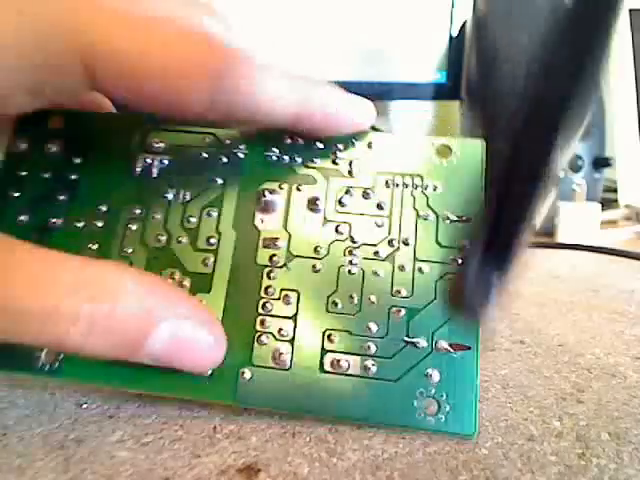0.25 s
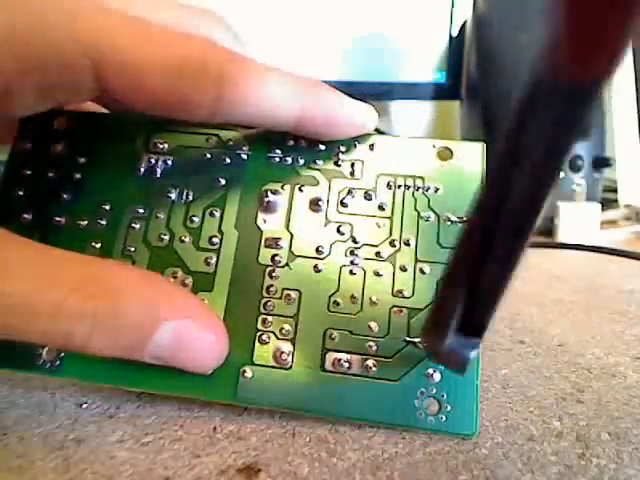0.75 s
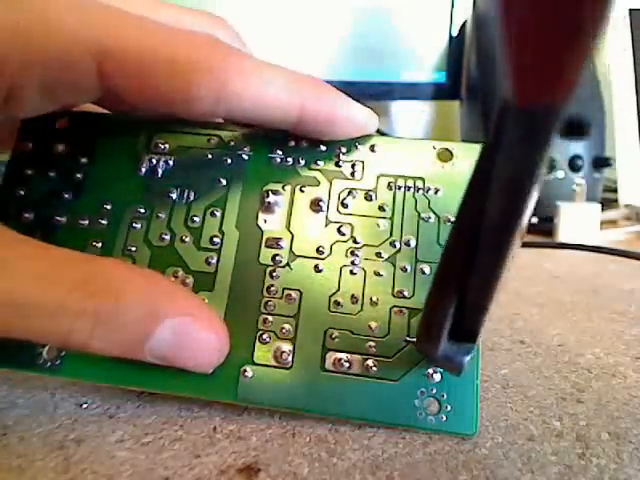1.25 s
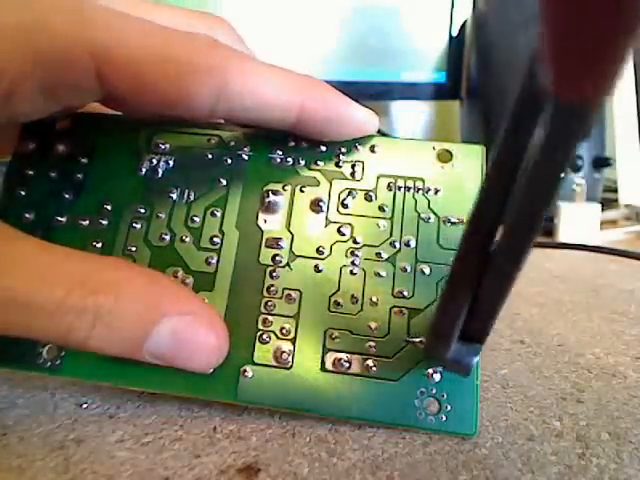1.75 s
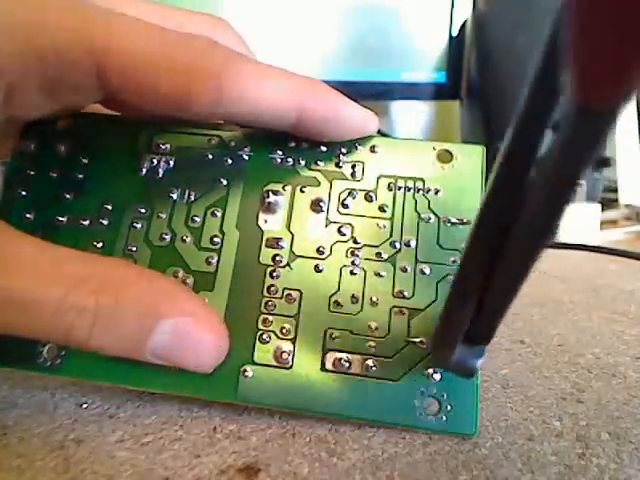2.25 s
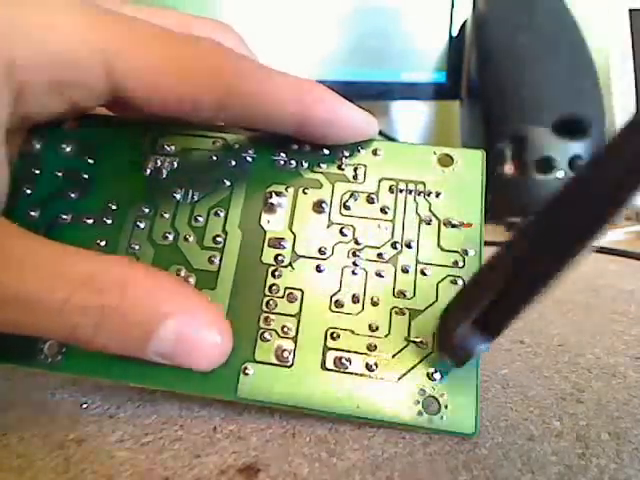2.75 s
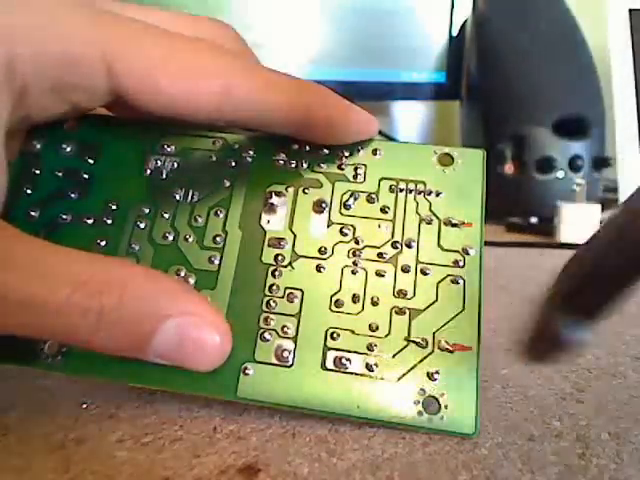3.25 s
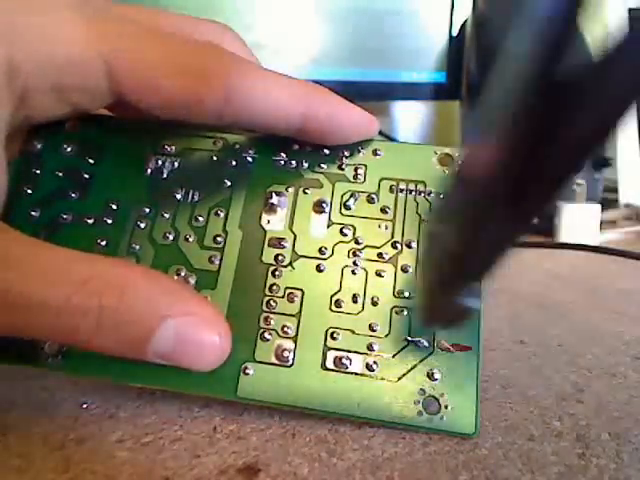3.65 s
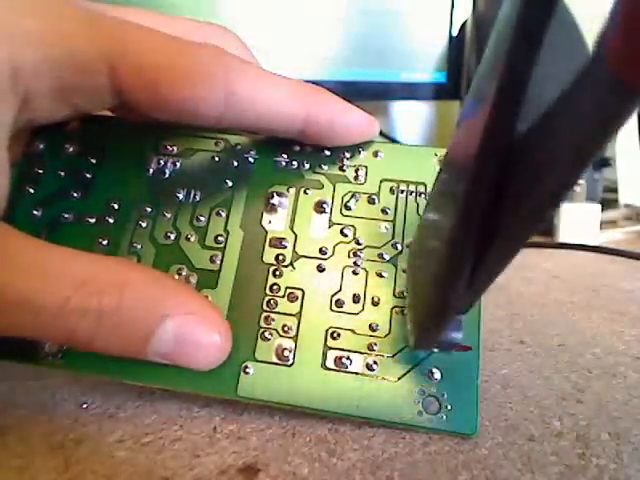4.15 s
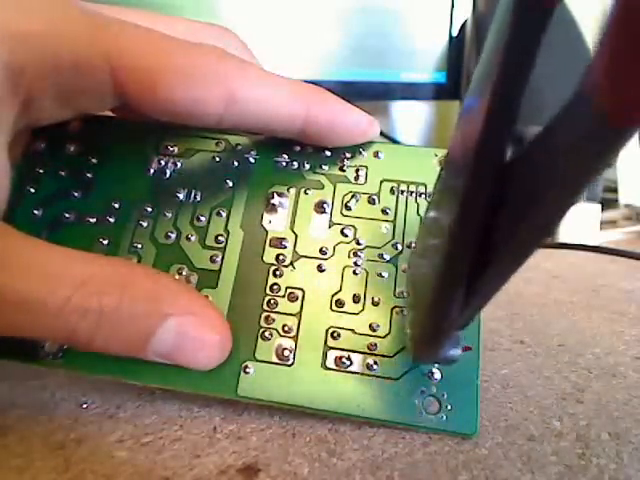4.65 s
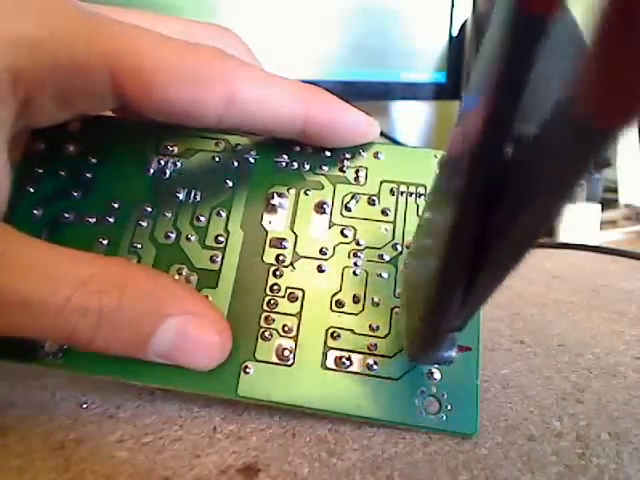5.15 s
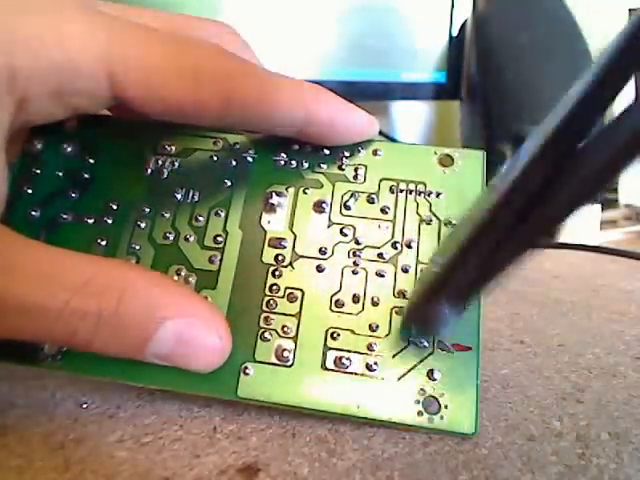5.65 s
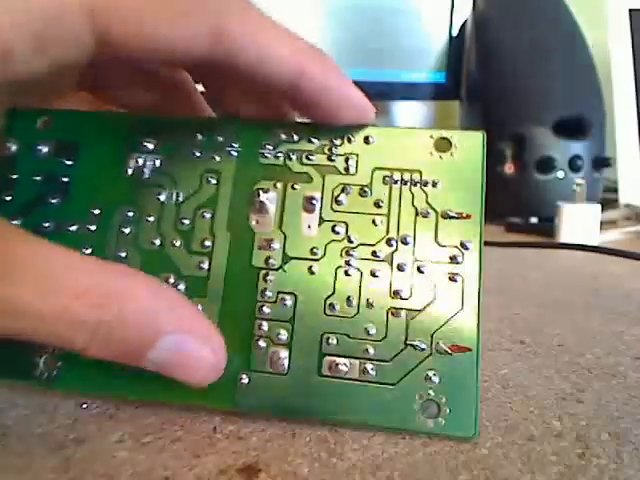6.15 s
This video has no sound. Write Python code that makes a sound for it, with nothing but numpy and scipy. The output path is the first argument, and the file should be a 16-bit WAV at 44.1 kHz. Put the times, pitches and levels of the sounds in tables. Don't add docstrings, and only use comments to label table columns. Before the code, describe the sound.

In a small room with humming fans, cutter jaws tap and bump a thin board, each contact short, dry and woody with a little steel click. Faint drags and skids fall between the knocks. A sharp crack and snip come midway, then stronger thuds, and a piercing clip at the very end sprays tiny debris. A far engine drones low, swelling and sinking slightly. The close, inexpensive camera microphone sounds dull and band-limited.

```python
import sys
import numpy as np
from scipy import signal
from scipy.io import wavfile
from scipy.ndimage import uniform_filter1d

SR = 44100
rng = np.random.default_rng(int(sys.argv[2]) if len(sys.argv) > 2 else 0)


def store_pcm(level_fs):
    pcm = np.round(np.clip(level_fs, -1, 1) * 32767).astype(np.int16)
    wavfile.write(sys.argv[1], SR, np.atleast_2d(pcm).T)


def voltage_ratio(decibels):
    exponent = np.asarray(decibels, float) / 20
    return 10 ** exponent


N = 282813

# frequency in Hz, density in dB per Hz.
ROOM_SPECTRUM = [(8.8, -27), (15, -1), (27, -23.5), (65, -11), (88, -28.5), (124, -15.5), (149, -33),
                 (231, -12.5), (264, -30.5), (360, -13), (390, -25), (767, -28.5), (6500, -49.5),
                 (7600, -52.5), (9880, -79), (16700, -120)]
ROOM_DB = -45
# frequency in Hz, width in Hz, level in dB.
FAN_WHIRRS = [(29.8, 25, -56.5), (50.7, 5, -57), (58.1, 1.5, -59), (87.2, 6, -61), (319.6, 13, -65),
              (774.6, 40, -63.5)]

# time in seconds, firing rate in Hz.
ENGINE_HZ = [
    (0, 121.5),
    (2.0, 121.2),
    (3.9, 119.3),
    (4.5, 116.8),
    (6.0, 116.4),
    (6.41, 114.5),
]
# middle in seconds, half length in seconds, level in dB.
ENGINE_SWELLS = [
    [(2.5, 0.18, -55), (3.85, .3, -56), (5.3, .35, -56), (6.1, 0.53, -51)],
    [(0, 0.21, -57.5), (2.8, 0.47, -52), (4.4, 1, -58.5), (5.95, 0.45, -55.5), (6.41, 0.039, -52.5)],
    [(.7, 0.14, -70), (3.05, 0.15, -61), (3.8, 0.27, -54.5), (4.8, 0.35, -58), (5.5, .3, -61.5)],
    [(2.75, .2, -66), (3.7, 0.17, -63), (4.85, .3, -61), (6.0, .12, -62.5)],
]
MUFFLED_DB = -78.5

# start in seconds, length in seconds, board
# rasp in dB, blade tips in dB, bench shudder in dB.
DRAGS = [
    (0.372, 0.13, -68, -70.5, -52),
    (3.094, 0.044, -50.5, -59.5, -54.5),
    (3.247, 0.1, -69.5, -69, -55.5),
    (5.721, 0.25, -65, -72, -48),
    (6.224, .14, -66, -70.5, -56),
    (6.339, 0.053, -54, -64.5, -59),
]
DRAG_BOARD_HZ, DRAG_BOARD_WIDTH_HZ = 2100, 2100
DRAG_TIPS_HZ, DRAG_TIPS_WIDTH_HZ = 6400, 920
# start in seconds, length in seconds, level in dB, centre in Hz.
SKIDS = [(0.089, 0.21, -70.5, 2950), (0.383, 0.1, -62.5, 2010), (0.386, 0.089, -70, 2860),
         (1.509, 0.018, -77, 2080), (1.5093, 0.02, -75.5, 2900), (1.528, 0.021, -74, 2801),
         (2.264, 0.18, -66, 3270), (2.665, 0.16, -72, 3050), (3.096, 0.047, -56, 4400),
         (3.097, 0.027, -56, 3220), (3.105, 0.048, -50.5, 718), (3.107, 0.033, -45.5, 302.8),
         (3.11, 0.065, -58, 2100), (3.13, 0.16, -69, 6450), (3.25, 0.1, -71, 2850),
         (3.262, 0.04, -66, 1555), (4.231, 0.042, -56.5, 350), (4.605, 0.028, -53, 299.6),
         (4.9162, 0.019, -47, 301), (4.972, 0.019, -75, 4900), (5.795, 0.047, -67, 1480),
         (5.823, 0.04, -67.5, 1503), (6.344, 0.036, -50, 7630), (6.345, 0.018, -61, 5200),
         (6.347, 0.026, -51, 3810)]
SKID_WIDTH_SHARE = 0.18
SHUDDER_DB = -13
# start in seconds, length in seconds, level in dB.
SCATTERS = [
    (3.125, 0.09, -65.5),
    (3.415, 0.14, -71.5),
    (6.073, 0.11, -75.5),
    (6.354, 0.15, -55.5),
]
SCATTER_HZ, SCATTER_WIDTH_HZ = 4360, 5000

# time in seconds, bench in dB, board's low modes in dB,
# board's high modes over its low ones in dB.
KNOCKS = [(0.173, -51, -50.5, 5), (0.397, -42, -36, -12), (0.422, -59, -36, -12), (1.0106, -21, -28, -2),
          (1.111, -39, -43, -2), (1.3173, -24.5, -31.5, -8.5), (1.697, -38, -50, -8),
          (2.329, -36, -58.5, 2), (2.449, -38.5, -54.5, 1), (2.6257, -36, -56, -14),
          (3.1065, -42.5, -17.5, 6.5), (3.194, -38, -40, -4.5), (3.279, -41, -40, 2.5),
          (4.2023, -24, -29.5, 5.5), (4.23, -28, -34, -1.5), (4.48, -35, -49, -20), (4.515, -31, -38, -4),
          (4.6031, -25.5, -21.5, -0.5), (4.647, -25.5, -27, -0.5), (4.9186, -12.5, -19, -13.5),
          (4.978, -25, -36, -7), (5.3484, -26.5, -32.5, -3.5), (5.626, -38.5, -63, -2),
          (5.775, -28, -35, -3), (5.858, -27.5, -39.5, -11.5), (5.95, -46.5, -42, -10),
          (6.257, -29, -36, -25), (6.3472, -35, -35, 4.5)]
# time in seconds, jaws in dB, blade tips over jaws in dB.
TICKS = [(1.0085, -41.5, -9), (1.3185, -44.5, -19.5), (1.484, -56.5, -4.5), (1.694, -54.5, -3),
         (2.329, -49.5, -16.5), (2.624, -45, -5), (3.1063, -32, 9.5), (3.194, -65.5, 25),
         (3.279, -59.5, 25.5), (3.415, -33.5, 3.5), (3.553, -47.5, 2.5), (4.2023, -35, -33),
         (4.6025, -41, -4.5), (4.9198, -34.5, -34), (4.977, -41.5, -5.7), (5.3478, -36.5, -22.5),
         (5.624, -48.5, -10.5), (5.858, -54, -1.5), (6.3453, -20.5, 1.5), (6.352, -26.5, 6.5)]
JAWS_UNDER_DB, TIPS_UNDER_DB = -18, -35
BOARD_UNDER_DB = -12.5

# frequency in Hz, level in dB, decay by 60 dB in seconds.
BENCH_MODES = [(171, -8, 0.1), (223.7, 0, 0.12), (283.4, 6, 0.08), (302.8, -0.5, 0.097),
               (386.4, -1.5, 0.16), (414, -5.5, 0.15), (495, -17.5, 0.048)]
# frequency in Hz, level in dB, decay by 60 dB in seconds.
BOARD_LOW_MODES = [(644, -5.5, 0.13), (716, 2, 0.11), (835, 9.5, 0.03), (950, 7, 0.033),
                   (1070, -15, 0.0083)]
# frequency in Hz, level in dB, decay by 60 dB in seconds.
BOARD_HIGH_MODES = [(1546, 7.5, 0.045), (1640, 11, 0.02), (1977, 9.5, 0.038), (2100, -22.5, 0.027),
                    (2530, -28.5, 0.014)]
# frequency in Hz, level in dB, decay by 60 dB in seconds.
JAW_MODES = [(2290, 1, 0.0042), (2900, -1, 0.037), (3080, 3.5, 0.013), (3745, 11, 0.011), (4230, -4, 0.012),
             (4390, -0.5, 0.007), (4900, -6, 0.0082), (5270, -15, 0.006)]
# frequency in Hz, level in dB, decay by 60 dB in seconds.
TIP_MODES = [(6090, 1.5, 0.029), (6450, -4.5, 0.016), (6500, -10.5, 0.0058), (6560, 5, 0.0028),
             (7150, -5.5, 0.0096)]
# modes, chatter in seconds, chatter in dB, room tail in seconds, room tail in dB,
# usual tilt in dB.
BODIES = [(BENCH_MODES, .006, -28, .03, -40, 4.0),
          (BOARD_LOW_MODES, .004, -24, .025, -40, 2.0),
          (BOARD_HIGH_MODES, .003, -22, .02, -38, 5.5),
          (JAW_MODES, .003, -20, .02, -36, -3.0),
          (TIP_MODES, .004, -18, .015, -34, 4.0)]

MIRROR_DB, MIRROR_KEPT_OVER_DB, MIRROR_FADES_HZ = -30, -58, 10200


def rms_one(x):
    return x / np.sqrt(np.mean(x ** 2) + 1e-20)


def drift(rate_hz):
    knots_hz = 40
    knots = rng.standard_normal(int(N / SR * knots_hz) + 40)
    r = np.exp(-2 * np.pi * rate_hz / knots_hz)
    slow = signal.lfilter([1], [1, -r], knots)[30:]
    return np.interp(np.arange(N) / SR * knots_hz, np.arange(len(slow)), rms_one(slow))


def bandpass(x, edges_hz):
    return signal.sosfilt(signal.butter(2, edges_hz, "band", fs=SR, output="sos"), x)


def resonance(x, hz, width_hz):
    r = np.exp(-np.pi * width_hz / SR)
    poles = [1, -2 * r * np.cos(2 * np.pi * hz / SR), r * r]
    return signal.lfilter([(1 - r * r) / 2, 0, (r * r - 1) / 2], poles, x)


def ring(push, hz, t60_s):
    r = voltage_ratio(-60 / (t60_s * SR))
    w = 2 * np.pi * hz / SR
    return signal.lfilter([0, np.sin(w)], [1, -2 * r * np.cos(w), r * r], push + 1e-18)


def add(out, piece, start_s):
    i = round(start_s * SR)
    out[i:i + len(piece)] += piece[:N - i]


def room():
    rumble, together = 0, drift(2.5)
    edges_hz = 14 * 2 ** np.arange(0, 9.6, 1 / 3)
    white = rng.standard_normal((2, N + SR))
    hz, db = np.transpose(ROOM_SPECTRUM)
    for k, (low, high) in enumerate(zip(edges_hz, edges_hz[1:])):
        band = bandpass(white[k % 2], [low, high])[SR:]
        log_centre = np.log(min(low * high, 7500 ** 2)) / 2
        level_db = np.interp(log_centre, np.log(hz), db)
        rumble = rumble + voltage_ratio(level_db + 0.24 * together + 1.4 * drift(11)) * band
    air = rng.standard_normal(N + SR)
    whirrs = 0
    for f, width_hz, whirr_db in FAN_WHIRRS:
        narrow = resonance(resonance(air, f, width_hz), f, width_hz)[SR:]
        whirrs = whirrs + voltage_ratio(whirr_db) * rms_one(narrow)
    return voltage_ratio(ROOM_DB - 3.0) * rms_one(rumble) + whirrs


def drone():
    t = np.arange(N) / SR
    turn = 2 * np.pi * np.cumsum(np.interp(t, *np.transpose(ENGINE_HZ))) / SR
    out = np.zeros(N)
    for k, swells in enumerate(ENGINE_SWELLS):
        gain = voltage_ratio(MUFFLED_DB) + sum(voltage_ratio(db) * np.exp(-((t - s) / half_s) ** 2) for s, half_s, db in swells)
        out += np.sqrt(2) * gain * voltage_ratio(0.54 * drift(1.5)) * np.sin((k + 1) * turn + k)
    return out


def stroke(length_s, peaks, bench_db):
    luck = rng.random((3, SR // 4))
    phase = np.clip(np.arange(SR // 4) / SR / length_s, 0, 1)
    pressure = np.sin(np.pi * phase ** 0.48) ** 2.6
    size = voltage_ratio(-2.2 * np.log(luck[2] + 0.00034))
    grains = (luck[0] < .2) * np.sign(luck[1] - .5) * size * pressure
    rasp = 0
    for hz, width_hz, db in peaks:
        rasp = rasp + voltage_ratio(db) * rms_one(resonance(resonance(grains, hz, width_hz), hz, 0.64 * width_hz))
    shaken = BENCH_MODES + BOARD_LOW_MODES[:2]
    shudder = sum(voltage_ratio(db) * ring(grains, hz, t60_s) for hz, db, t60_s in shaken)
    to_stroke = np.sqrt(len(phase) / SR / length_s)
    return to_stroke * (rasp + voltage_ratio(bench_db) * rms_one(shudder))


def scrapes():
    out = np.zeros(N)
    for s, length_s, board_db, tips_db, bench_db in DRAGS:
        board = (DRAG_BOARD_HZ, DRAG_BOARD_WIDTH_HZ, board_db)
        tips = (DRAG_TIPS_HZ, DRAG_TIPS_WIDTH_HZ, tips_db)
        add(out, stroke(length_s, [board, tips], bench_db), s)
    for s, length_s, db, hz in SKIDS:
        add(out, stroke(length_s, [(hz, SKID_WIDTH_SHARE * hz, db)], db + SHUDDER_DB), s)
    for s, length_s, db in SCATTERS:
        add(out, stroke(length_s, [(SCATTER_HZ, SCATTER_WIDTH_HZ, db)], db + SHUDDER_DB), s)
    return out


def struck(modes, push, tilt_db, luck):
    slope_db = np.linspace(-tilt_db, tilt_db, len(modes))
    sound = 0
    for (hz, db, t60_s), up_db, z in zip(modes, slope_db, luck):
        sound = sound + voltage_ratio(db + up_db + 2.0 * z) * ring(push, hz, t60_s)
    sound = bandpass(sound, [modes[0][0] * .75, modes[-1][0] * 1.12])
    return sound / np.abs(sound).max()


def knocks():
    out = np.zeros(N)
    t = np.arange(round(.22 * SR)) / SR
    contacts = []
    for s, bench_db, low_db, up_db in KNOCKS:
        high_db = low_db + up_db
        contacts.append((s, bench_db, low_db, high_db, high_db + JAWS_UNDER_DB, high_db + TIPS_UNDER_DB))
    for s, jaws_db, up_db in TICKS:
        contacts.append((s, jaws_db + BOARD_UNDER_DB, jaws_db, jaws_db + up_db))
    for s, *levels_db in contacts:
        grit = rng.standard_normal(len(t))
        luck = rng.standard_normal((5, 12))
        leans_db = 0.79 * np.gradient(levels_db)
        for body, db, lean_db, z in zip(BODIES[-len(levels_db):], levels_db, leans_db, luck):
            modes, chatter_s, chatter_db, tail_s, tail_db, usual_tilt_db = body
            chatter = voltage_ratio(chatter_db) * np.exp(-t / chatter_s)
            tail = voltage_ratio(tail_db) * np.exp(-t / tail_s)
            push = grit * (chatter + tail) + (t == 0)
            tilt_db = np.clip(lean_db + usual_tilt_db, -8, 8)
            add(out, voltage_ratio(db) * struck(modes, push, tilt_db, z), s - .0004)
    return out


def scene():
    return (knocks() + scrapes() + drone() + room())[None]


def coarse_spectrum(x, step_db, follow, uneven_db):
    shape = dict(window=np.sqrt(signal.get_window("hann", 1024)), nperseg=1024, noverlap=512)
    hz, _, z = signal.stft(x, SR, **shape)
    heard = z[(hz > 200) & (hz < 8000)]
    busy_db = 10 * np.log10(np.mean(np.abs(heard) ** 2, axis=0) + 1e-14)
    luck = uniform_filter1d(rng.standard_normal((65, z.shape[1])), size=5, axis=1)
    luck = luck[np.arange(len(hz)) // 8]
    hiss = np.median(np.abs(z[(hz > 4000) & (hz < 6500)]))
    step = hiss * voltage_ratio(step_db + follow * (busy_db - np.median(busy_db)) + uneven_db * luck)
    rounded = step * (np.round(z.real / step) + 1j * np.round(z.imag / step))
    return signal.istft(rounded, SR, **shape)[1][:N]


def mirror(x):
    turned = x * np.cos(2 * np.pi * 16000 * np.arange(N) / SR)
    high = signal.sosfilt(signal.ellip(6, 1, 60, [8900, 15300], "band", fs=SR, output="sos"), turned)
    high = signal.sosfilt(signal.butter(4, MIRROR_FADES_HZ, fs=SR, output="sos"), high)
    loud_db = 10 * np.log10(uniform_filter1d(high ** 2, size=600) + 1e-14)
    return voltage_ratio(MIRROR_DB) * high / (0.5 + np.exp((MIRROR_KEPT_OVER_DB - loud_db) / 2.5))


def band_limit(x):
    return signal.sosfilt(signal.butter(12, 15200, fs=SR, output="sos"), x)


def record(dry):
    offset = -.0134
    narrow = signal.sosfilt(signal.cheby2(16, 55, 8030, fs=SR, output="sos"), dry)
    narrow = coarse_spectrum(narrow[0], step_db=.2, follow=.45, uneven_db=9.0)
    mix = (narrow + mirror(narrow) + offset)[None]
    return band_limit(mix)


dry = scene()
out = record(dry)
store_pcm(out)
```